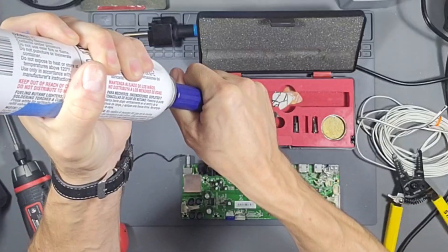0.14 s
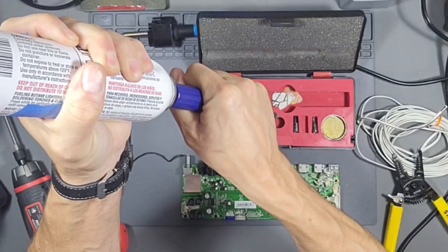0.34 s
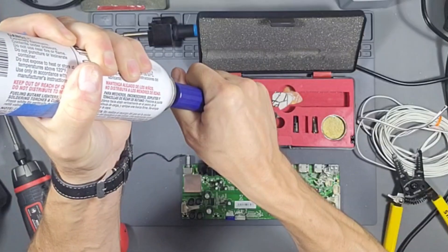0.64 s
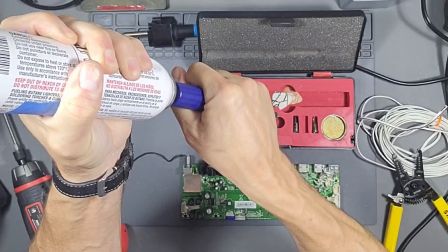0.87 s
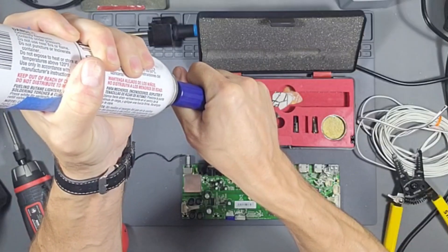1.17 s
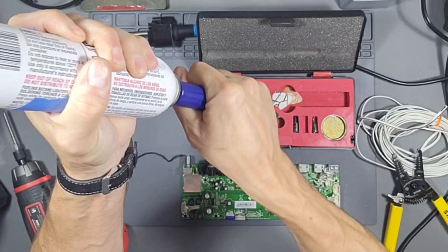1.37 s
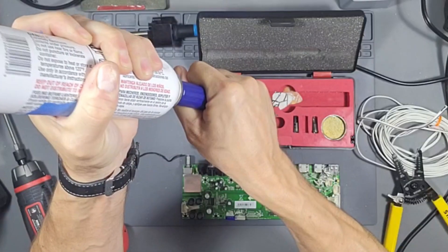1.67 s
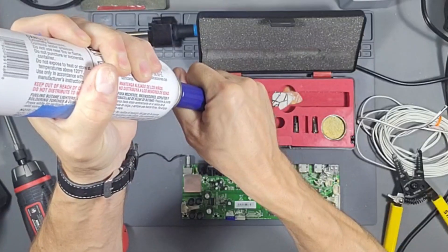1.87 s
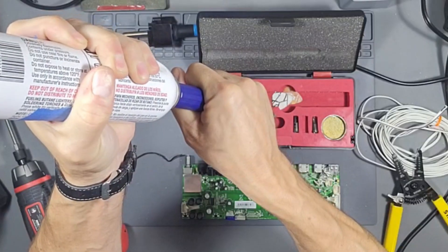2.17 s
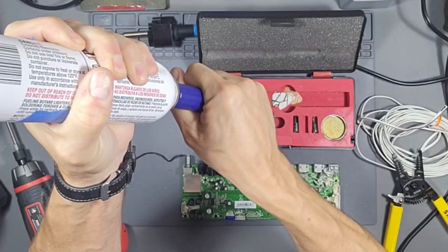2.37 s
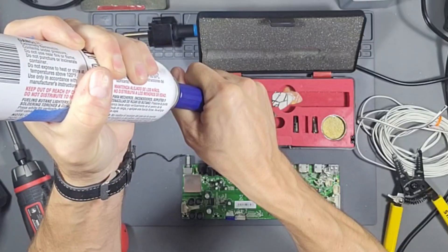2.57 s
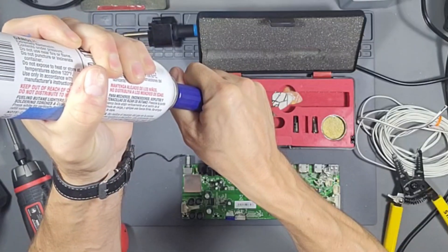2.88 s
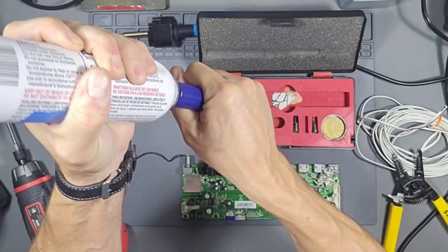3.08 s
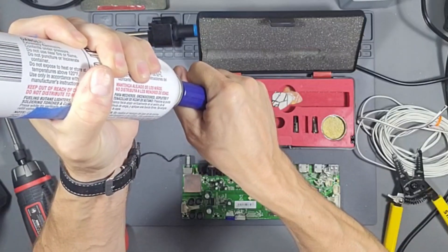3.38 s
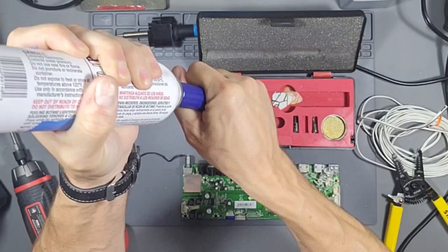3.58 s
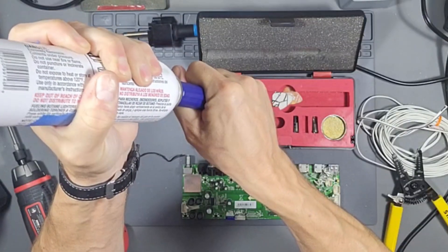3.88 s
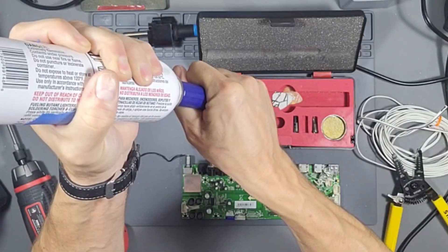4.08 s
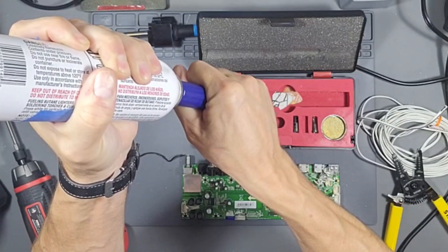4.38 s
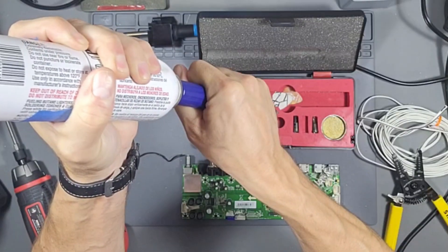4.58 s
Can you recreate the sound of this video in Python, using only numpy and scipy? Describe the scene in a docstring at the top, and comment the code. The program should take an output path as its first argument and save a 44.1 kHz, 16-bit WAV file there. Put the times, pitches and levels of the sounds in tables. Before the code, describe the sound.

Butane hisses from a can pressed onto the fill valve of a soldering iron, close to the microphone at a workbench. The hiss is high and thin with a slight whistling edge, and it runs without a break, its colour shifting a little with the pressure of the hand. Soft, dull handling knocks come now and then, mostly in the second half, over a faint low hum in a quiet room.

```python
"""Butane hisses from a can pressed onto the fill valve of a soldering iron, close by on a workbench.
The turbulent jet rings the valve's narrow cavities near 9 kHz; its colour shifts with the hand's
pressure and the seating of the nozzle. Soft, dull handling knocks come now and then, over low
mains hum and a faint fan in a quiet room."""
import sys
import numpy as np
from scipy import signal
from scipy.fft import rfft, irfft
from scipy.io import wavfile
from scipy.ndimage import uniform_filter1d

SR = 44100
rng = np.random.default_rng(int(sys.argv[2]) if len(sys.argv) > 2 else 0)


def store_wav(level_fs):
    """Save 16-bit WAV to argv[1]."""
    pcm = np.round(np.clip(np.atleast_2d(level_fs), -1, 1) * 32767)
    wavfile.write(sys.argv[1], SR, pcm.T.astype(np.int16))


N = 209254
TIME, HZ = np.arange(N) / SR, np.fft.rfftfreq(N, 1 / SR)


def amp(db):
    """dB to gain."""
    return 10 ** (np.asarray(db) / 20)


def unit_rms(x):
    """Scale to rms 1."""
    return x / np.sqrt(np.mean(x ** 2) + 1e-20)


def curve_at(table, hz, column=1):
    """Table column interpolated over log frequency."""
    columns = np.transpose(table)
    return np.interp(np.log(hz + 1), np.log(columns[0] + 1), columns[column])


def white_spectrum():
    """Spectrum of fresh white noise."""
    return rng.standard_normal(len(HZ)) + 1j * rng.standard_normal(len(HZ))


def wander(rate_hz):
    """Smooth random signal, rms 1, rolling off at rate_hz."""
    return unit_rms(irfft(white_spectrum() * np.exp(-(HZ / rate_hz) ** 2) * (HZ > 0), N))


def low_noise(table, split_hz, right_db, decorrelation=0.55):
    """Stereo noise, rms 1: long waves reach both sides alike, short ones differ and lean right."""
    apart = 1 - 1 / (1 + (HZ / split_hz) ** 4)
    coherence = 1 - decorrelation * apart
    left = white_spectrum()
    right = (coherence * left + np.sqrt(1 - coherence ** 2) * white_spectrum()) * amp(right_db * apart)
    return unit_rms(irfft(np.array([left, right]) * amp(curve_at(table, HZ)), N))


def jet():
    """Turbulence: a diffuse rush plus cavity resonances that reach each side by their own path."""
    # jet rush: (frequency [Hz], left density [relative dB], right density [relative dB])
    rush = [(700, -45, -44.5), (1040, -47.5, -43), (1790, -55, -66), (3010, -35.5, -32.5), (3640, -35, -41),
            (3860, -67, -36), (5400, -31, -27.5), (6900, -81, -25), (8600, -30, -23), (9400, -10.5, -32),
            (9970, -13.5, -13), (12200, -23, -32), (14100, -27, -27.5), (15900, -33, -32)]
    # resonances of valve, nozzle and cupped hand:
    # (frequency [Hz], width [Hz], left [relative dB], right [relative dB], left phase lead [rad])
    cavities = [(1224, 154, -44.5, -36, 1.05), (1665, 360, -38, -30.5, -1), (2090, 380, -36, -24, 1.1),
                (2517, 200, -56, -29, 0), (4110, 420, -29.5, -28.5, 0.95), (4414, 187, -25, -25, 1.2),
                (4744, 260, -22.5, -26, -2), (5300, 660, -28, -26.5, -0.45), (6000, 370, -32, -27, -5),
                (6360, 820, -32.5, -32, -0.1), (7230, 310, -28, -19, 1), (7397, 220, -27, -18.5, 3.5),
                (8780, 306, -24, -3.5, -1.9), (8790, 105, -13, -5, 1), (9110, 248, -13, -3, -0.64),
                (9351, 87, -10, -2.5, 0), (9493, 410, -18, -8, -0.5), (9760, 19, -13, -31, 0),
                (10010, 145, -30, -9, -8), (10060, 76, -8, -8, -2.5), (9930, 92, -15.5, -12, -0.5),
                (10280, 110, -14, -6, -2.5), (10650, 86, -15.5, -28, -0.5), (10920, 126, -14, -10.5, 1.5),
                (11540, 220, -12.5, -12, 4), (11770, 107, -11, -23, -0.5), (12330, 560, -14, -20, -4),
                (12590, 200, -9.5, -19, 2.5), (12800, 140, -23, -22, -3.5), (13240, 300, -24, -18, -1.5),
                (14400, 350, -35, -27, -0.5), (15560, 460, -26, -24, -2.5)]
    spectrum = np.array([white_spectrum() * amp(curve_at(rush, HZ, side)) for side in (1, 2)])
    spectrum *= HZ ** 2 / (HZ ** 2 + 300 ** 2)  # a small jet radiates no bass
    for hz, width_hz, left_db, right_db, lead_rad in cavities:
        ring = white_spectrum() / (1 + 2j * (HZ - hz) / width_hz) ** 2
        spectrum += np.outer([amp(left_db) * np.exp(1j * lead_rad), amp(right_db)], ring)
    return unit_rms(irfft(spectrum, N))


def nozzle_seating(t, slip_s=0.056):
    """The nozzle slips from seat to seat, favouring other cavities; returns three band gains in dB."""
    # nozzle seats: (time [s], rush [dB], main ring [dB], upper ring [dB])
    seats = [(0, -1.5, 0, -5), (0.11, 2.3, 1, -0.3), (0.38, -0.5, -1.2, 0.5), (0.59, 0, -0.8, 2.5),
             (1.04, -0.3, 0, 4), (1.36, -0.5, 0.6, 0), (2.0, 0.2, -1.6, 1.3), (3.07, -1.9, 1.5, -1.8),
             (3.57, -0.5, 0.5, -1.45)]
    seats = np.array(seats)
    slipped = np.clip((t - seats[1:, :1]) / slip_s + 0.5, 0, 1)
    steps_db = np.diff(seats[:, 1:], axis=0).T
    return seats[0, 1:, None] + steps_db @ slipped


def hand_ridges(shape, span_bins=4, span_frames=220):
    """Narrow spectral peaks and dips that come and go as the hands shift."""
    field = uniform_filter1d(rng.standard_normal(shape), span_bins, axis=0)
    return unit_rms(uniform_filter1d(field, span_frames, axis=1))


def gas_hiss(base_db=-31.0, ridge_db=1.42, sputter_db=0.61, sputter_hz=130,
             tremor_hz=7, flow_tremor_db=0.37, ring_tremor_db=0.74):
    """The jet, coloured by flow and seating; the pressing hand trembles, boiling droplets sputter."""
    # valve flow under the hand's pressure: (time [s], flow [dB re usual])
    flow = [(0, -2), (0.06, -3), (0.14, 0), (0.27, 0), (0.47, 0), (0.6, 3), (0.75, 3), (1.22, 1.5),
            (1.5, -1), (2.1, -1.7), (2.72, -2.3), (3.0, -1.1), (3.1, -1.3), (3.35, 0.3), (3.5, -1.3),
            (3.6, -3), (4.74, -2.5)]
    # jet response to flow: (frequency [Hz], slope [dB/dB])
    flow_response = [(700, 1.3), (1300, 2.13), (1800, 1.2), (2100, 1.75), (2700, 1.08), (4500, 0.56),
                     (8000, 0.9), (8750, -0.23), (9350, 0.07), (10100, 0.06), (10900, 1), (11500, 1.5),
                     (12550, 1.05), (13400, 2.2), (15000, 0.3)]
    # bands of the rush, main ring and upper ring: (centre [Hz], half width [Hz])
    bands = [(6000, 1800), (8880, 590), (10250, 1330)]
    hz, t, frames = signal.stft(jet(), SR, nperseg=1024, noverlap=768)
    hz = hz[:, None]
    flow_db = np.interp(t, *np.transpose(flow))
    flow_db += flow_tremor_db * np.interp(t, TIME, wander(tremor_hz))
    rush_db, main_db, upper_db = nozzle_seating(t)
    main_db += ring_tremor_db * np.interp(t, TIME, wander(tremor_hz))
    gain_db = curve_at(flow_response, hz) * flow_db
    for (centre_hz, half_width_hz), band_db in zip(bands, (rush_db, main_db, upper_db)):
        gain_db += band_db * np.exp(-((hz - centre_hz) / half_width_hz) ** 4)
    gain_db += ridge_db * hand_ridges(gain_db.shape)
    _, gas = signal.istft(frames * amp(gain_db), SR, nperseg=1024, noverlap=768)
    return gas[:, :N] * amp(base_db + sputter_db * wander(sputter_hz))


def bench_reflections(x, echo_db=-9.0, min_delay_s=0.007, spread_s=0.02, count=90):
    """Echoes off bench, case and walls comb the sound finely, differently on each side."""
    taps = np.zeros((2, SR // 2))
    for side in taps:
        delays_s = min_delay_s + spread_s * rng.exponential(1, count)
        at = np.minimum(SR * delays_s, len(side) - 1).astype(int)
        side[at] = rng.choice([-1., 1.], count) * amp(echo_db) / np.sqrt(count)
    taps[:, 0] = 1  # direct path
    return signal.fftconvolve(x, taps / np.linalg.norm(taps[0]), axes=1)[:, :N]


def contacts(land_hz=78.2, land_rattle_s=0.13, settle_delay_s=0.092, settle_hz=65.3, settle_rattle_s=0.1):
    """Each knock lands, then the load settles: lower in pitch, with a shorter, weaker rattle."""
    # knocks: (time [s], rattle [dB], skin scrape [dB re rattle], landing thud [dB], settling thud [dB])
    knocks = [ (0.0, -64, 13.5, -58, -64), (1.225, -64, 15, -53, -66), (1.83, -51.5, -2, -45.5, -41.5),
              (2.266, -52, 1.5, -56, -42.5), (2.681, -54, -3.5, -48, -46), (2.99, -47, -5.5, -40.5, -43.5),
              (3.283, -46.5, -3.5, -43.5, -36.5), (3.85, -50, 0.5, -46.5, -44),
              (4.634, -44, -4.5, -41.5, -38)]
    for start_s, rattle_db, scrape_db, land_db, settle_db in knocks:
        yield start_s, land_db, land_hz, rattle_db, land_rattle_s, scrape_db
        yield start_s + settle_delay_s, settle_db, settle_hz, rattle_db - 4, settle_rattle_s, scrape_db - 10.5


def padded_mode(t, hz, peak_s):
    """A mode struck through flesh: swells until peak_s, then dies."""
    return t / peak_s * np.exp(1 - t / peak_s) * np.sin(2 * np.pi * (hz * t + rng.random()))


def handling_knocks(rise_s=0.011, scrape_hz=380, ring_hz=262, ring_re_rattle_db=-5.0, ring_pan_db=-10):
    """Each contact: a padded thud, a hollow ring and a short rattle, brighter where skin slides."""
    # hollow body shaken by the knocks: (frequency [Hz], density [relative dB])
    body_spectrum = [(25, -11), (55, -12), (110, 10), (138, -4), (165, 1), (205, -2), (255, -2), (330, -5),
                     (362, -9), (395, -5.5), (465, -11.5), (510, -8), (580, -16), (1500, -38)]
    body = low_noise(body_spectrum, split_hz=177, right_db=3.0)
    scrape = irfft(rfft(body) / (1 + (scrape_hz / (HZ + 1)) ** 8), N)  # high-pass
    ring_sides = amp([[ring_pan_db / 2], [-ring_pan_db / 2]])
    out = np.zeros((2, N))
    for start_s, thud_db, thud_hz, rattle_db, rattle_s, scrape_db in contacts():
        t = np.maximum(TIME - start_s, 0)
        out += amp(thud_db) * padded_mode(t, thud_hz, peak_s=0.02)
        out += amp(rattle_db + ring_re_rattle_db) * ring_sides * padded_mode(t, ring_hz, peak_s=0.013)
        envelope = (1 - np.exp(-t / rise_s)) * np.exp(-(t / rattle_s) ** 2)
        rattle = np.roll(body + (amp(scrape_db) - 1) * scrape, rng.integers(N), axis=1)
        out += amp(rattle_db) * envelope * rattle
    return out


def room_tone(air_db=-57.5, waver_db=1.2, drift_rad=0.11):
    """Low room air under wavering mains and fan tones."""
    # room air: (frequency [Hz], density [relative dB])
    air_spectrum = [(15, -38), (36, -3.5), (55, 5), (90, 2.5), (118, -3.5), (140, -13), (200, -18.5),
                    (255, -16), (330, -20), (540, -24.5), (750, -28.5), (2000, -58)]
    # mains hum and fan: (frequency [Hz], rms level [dB], left minus right [dB])
    hum = [(59.2, -56.5, 0.5), (238.2, -77.5, -14.5), (456, -85.5, 7)]
    out = amp(air_db) * low_noise(air_spectrum, split_hz=189, right_db=3.5)
    for hz, level_db, pan_db in hum:
        phase = 2 * np.pi * (hz * TIME + rng.random()) + drift_rad * wander(rate_hz=4.6)
        tone = np.sqrt(2) * amp(level_db + waver_db * wander(rate_hz=6.8)) * np.sin(phase)
        out += np.outer(amp([pan_db / 2, -pan_db / 2]), tone)
    return out


def scene():
    """Reflected hiss, knocks and room, in stereo."""
    return bench_reflections(gas_hiss()) + handling_knocks() + room_tone()


def record(dry):
    """Steep low-pass."""
    cutoff_hz = 15790
    lowpass = signal.firwin(801, cutoff_hz, window=("kaiser", 9), fs=SR)
    return signal.oaconvolve(dry, lowpass[None], "same")


dry = scene()
out = record(dry)
store_wav(out)
```